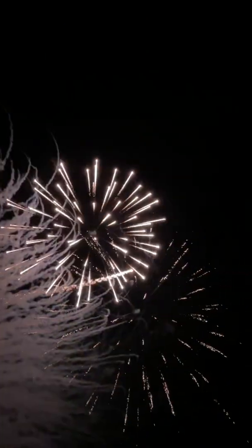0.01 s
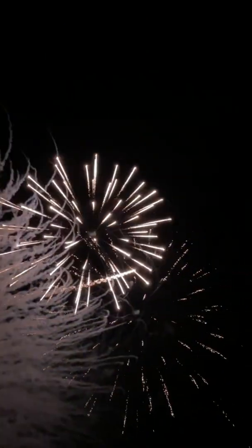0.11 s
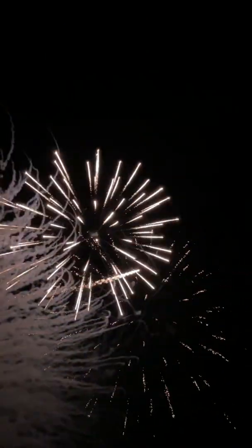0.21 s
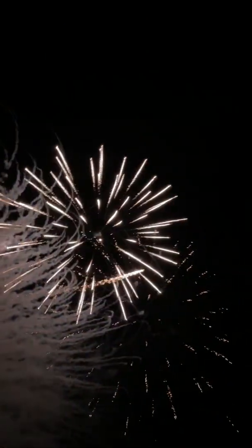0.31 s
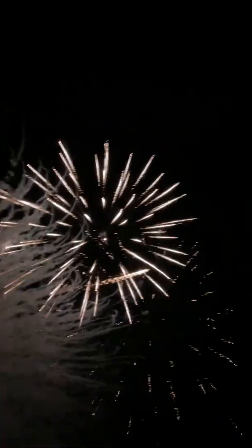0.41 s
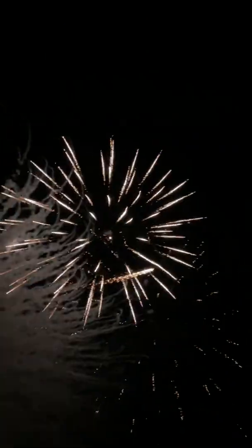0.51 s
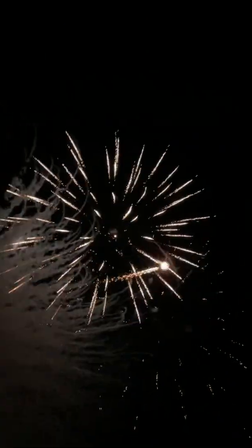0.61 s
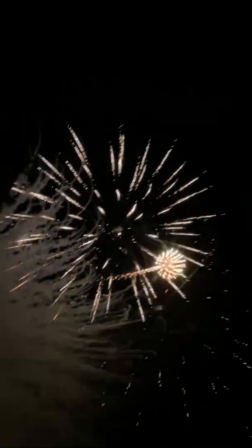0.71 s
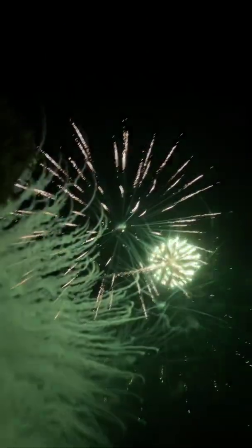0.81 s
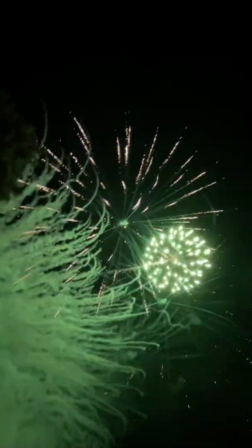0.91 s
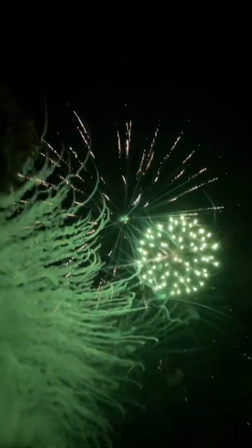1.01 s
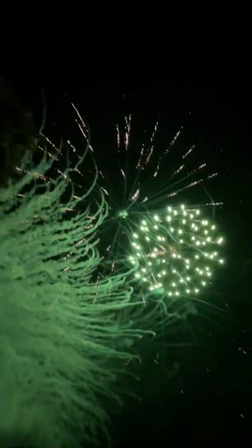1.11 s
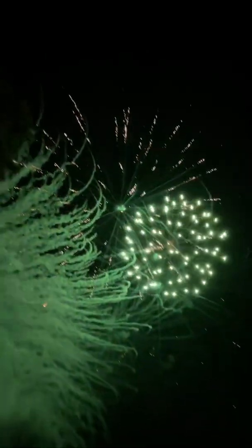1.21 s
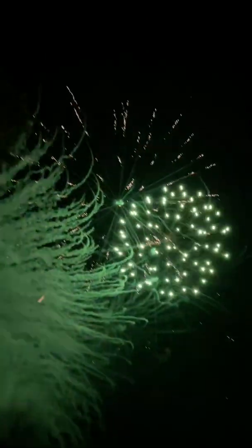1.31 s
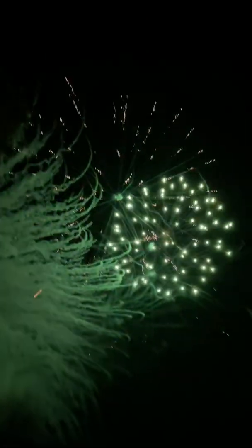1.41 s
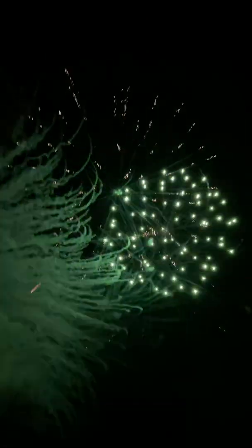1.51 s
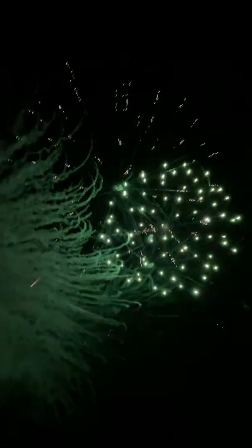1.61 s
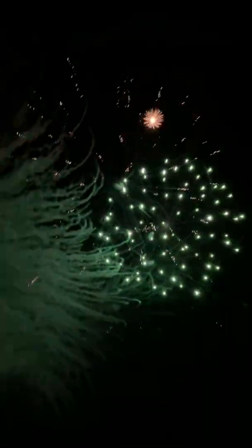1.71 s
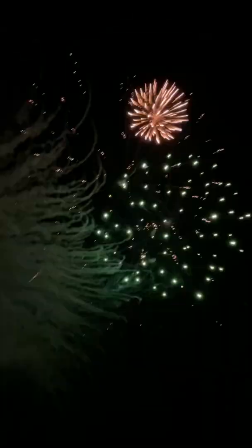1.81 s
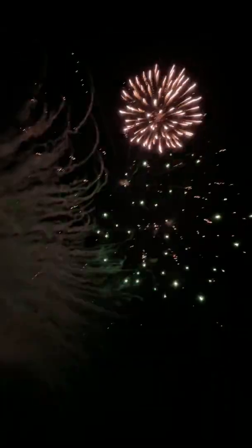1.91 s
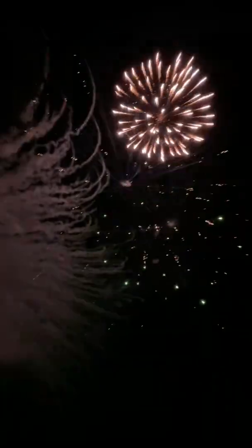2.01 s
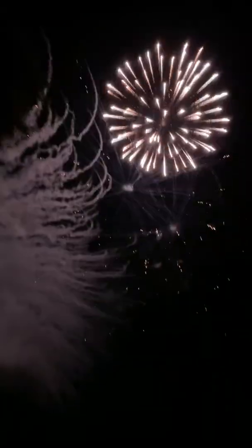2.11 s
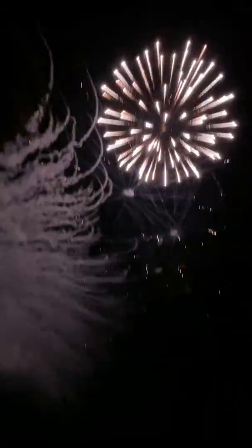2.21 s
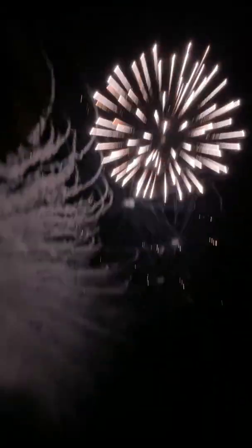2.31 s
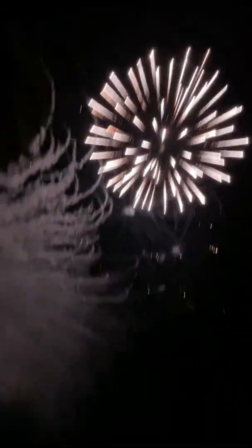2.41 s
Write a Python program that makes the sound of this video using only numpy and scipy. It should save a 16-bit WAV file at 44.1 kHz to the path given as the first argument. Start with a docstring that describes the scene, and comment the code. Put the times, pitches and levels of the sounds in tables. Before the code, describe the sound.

Firework shells burst outdoors: one ragged crack with a deep thump, then two round booming bangs

```python
"""Open ground at night, under bursting firework shells: one ragged crack with a deep thump, then two round bangs.
Each burst is a short pressure pulse with a ground echo, and rolls away as fading noise from all around.
An earlier roll is still dying away over a low rumble; small pops and dull thuds lie between the bursts.
The microphone delays the bass, so every bang sweeps downward, and its right port is loudest near 2 kHz."""
import sys
import numpy as np
from scipy import signal
from scipy.fft import rfft, irfft
from scipy.io import wavfile
from scipy.ndimage import map_coordinates

SR = 44100
rng = np.random.default_rng(int(sys.argv[2]) if len(sys.argv) > 2 else 0)


def transcribe(signal):
    """Save signal, clipped to [-1, 1], as a 16-bit WAV file at the path in sys.argv[1]."""
    frames = np.atleast_2d(signal).T
    limited = np.clip(frames, -1, 1)
    pcm = np.round(limited * 32767).astype(np.int16)
    wavfile.write(sys.argv[1], SR, pcm)


N = 110250  # samples in the scene
SIZE = 4 * SR  # samples in each spectrum, with spare room after the scene
HZ = np.fft.rfftfreq(SIZE, 1 / SR)
T = np.arange(N) / SR


def amp(db):
    """Turn decibels into a plain gain."""
    return 10 ** (np.asarray(db) / 20)


def along(points, hz=HZ):
    """Join (frequency, value) points with straight lines on a log frequency axis."""
    point_hz, value = np.transpose(points)
    return np.interp(np.log(hz + 1), np.log(point_hz + 1), value)


def causal(points):
    """Filter with the given (Hz, dB) gain that reacts as early as it can (minimum phase)."""
    cepstrum = irfft(np.log(amp(along(points))))
    # folding the second half onto the first keeps the gain and leaves nothing before time zero
    cepstrum[1:SIZE // 2] *= 2
    cepstrum[SIZE // 2 + 1:] = 0
    return np.exp(rfft(cepstrum))


def delay(seconds):
    """Spectrum of a plain delay: a phase turn that grows with frequency."""
    return np.exp(-2j * np.pi * HZ * seconds)


def sound(spectrum):
    """Turn a spectrum into the samples of the scene."""
    return irfft(spectrum, SIZE)[..., :N]


def wobble(rate):
    """A smooth random curve through `rate` random points a second."""
    return map_coordinates(rng.standard_normal(1024), [T * rate], mode="wrap")


# how alike left and right are, 1 = the same, -1 = opposite: (frequency [Hz], likeness [-1 to 1])
LIKENESS = [(60, 1), (120, 0.98), (240, 0.91), (380, 0.32), (520, 0.055), (750, -0.61), (1050, -0.63),
            (1400, 0.22), (1800, 0.53), (2800, -0.034), (4000, 0.17), (7500, -0.18), (15000, 0.32)]


def diffuse(points):
    """Stereo noise from all around: a shared part and an opposed part, most alike in the bass."""
    angle = np.arccos(np.clip(along(LIKENESS), -1, 1)) / 2
    noise = rfft(rng.standard_normal((2, SIZE))) * amp(along(points))
    mid, side = noise * [np.cos(angle), np.sin(angle)]
    return sound(np.array([mid + side, mid - side]))


def pulse(points, ragged_hz, ragged_s):
    """Spectrum of one pressure pulse: clean below ragged_hz, torn into a short noise burst above."""
    burst = rng.standard_normal((2, N)) * T * np.exp(-T / ragged_s)
    torn = rfft(burst / np.linalg.norm(burst, axis=1, keepdims=True), SIZE)
    torn /= np.sqrt(np.abs(torn) ** 2 + .1)  # even out the burst's own peaks and gaps
    torn_share = HZ ** 2 / (HZ ** 2 + ragged_hz ** 2)
    clean_share = np.sqrt(1 - torn_share ** 2)
    return causal(points) * (clean_share + torn_share * torn)


ECHO_SPREAD_S = .0008  # the ground echo reaches the right port this much after the left


def ground(lag_s, echo_db, dull_hz):
    """The direct path plus a later copy off the ground, duller above dull_hz."""
    paths = np.array([delay(lag_s - ECHO_SPREAD_S / 2), delay(lag_s + ECHO_SPREAD_S / 2)])
    return 1 + paths * amp(echo_db) / (1 + 1j * HZ / dull_hz)


# time the roll takes to drop by 60 dB: (frequency [Hz], time [s])
ROLL_DECAY = [(60, 1.67), (250, 1.88), (1000, 2.7), (2300, 1.87), (4200, 1.41), (8000, 1.075),
              (14000, 0.39)]
BLOOM_S, BLOOM_DB, BLOOM_WIDTH_S = 0.17, 1.5, .065  # the strongest group of echoes: age, lift, width
SCATTER_S = 0.004  # decay time of the scatter from close by


def roll(start, points, early_db, early_s, hold_s, scatter_db, flutter_db, bloom_s=BLOOM_S):
    """Noise for countless far echoes after brief close scatter: they bloom and die away, the high treble fastest."""
    hz, t, bands = signal.stft(diffuse(points), SR, nperseg=512)
    # each band holds its level for hold_s, then fades at its own speed
    bands = bands * amp(-60 * np.maximum(t - start - hold_s, 0) / along(ROLL_DECAY, hz)[:, None])
    fading = signal.istft(bands, SR, nperseg=512)[1][:, :N]
    age = np.maximum(T - start, 0)
    early = early_db * np.clip(1 - age / early_s, 0, 1)  # extra level that fades out over early_s
    bloom = BLOOM_DB * np.exp(-((age - bloom_s) / BLOOM_WIDTH_S) ** 2)
    far = amp(early + bloom)
    near = amp(scatter_db) * np.exp(-age / SCATTER_S)
    onset = np.clip(age / 0.0023, 0, 1)
    flutter = amp(flutter_db * (wobble(30.03) + wobble(220)))
    return fading * np.hypot(far, near) * onset * flutter


# spectrum of the earlier shell's roll: (frequency [Hz], level [dB])
EARLIER_SPECTRUM = [(20, -35), (60, -3.5), (130, -4.5), (260, -8), (420, -20.5), (800, -17.5),
                    (1400, -21.5), (2300, -22), (4000, -27), (6500, -34), (9500, -33), (11500, -54),
                    (16000, -61.5)]


def earlier_roll():
    """The roll of a shell that burst before the scene begins, still dying away."""
    return amp(-2.5) * roll(-0.28, EARLIER_SPECTRUM, early_db=0, early_s=.1, hold_s=0.11,
                            scatter_db=0, flutter_db=0.56)


# spectrum of the background rumble: (frequency [Hz], level [dB])
RUMBLE_SPECTRUM = [(20, -56), (40, -43.5), (62, -21.5), (220, -30.5), (450, -42.5), (1000, -45),
                   (2300, -49), (4000, -61), (8000, -74.5), (12000, -90)]


def rumble():
    """Steady noise from all around, strongest in the bass."""
    return diffuse(RUMBLE_SPECTRUM)


# dull far thuds and late echoes: (time [s], level [dB], pitch [ratio])
THUD_EVENTS = [(.007, -3, 1.24), (0.077, -1, 1.14), (.284, -1.5, 1.36), (.632, 3, 0.76),
               (1.315, -5.5, 1.48)]
# spectrum of a thud at pitch 1: (frequency [Hz], level [dB])
THUD_SPECTRUM = [(25, -9), (58, 21), (92, 28.5), (160, 14), (280, 1), (1000, -43), (8000, -100)]


def thuds():
    """Far reports and strong late echoes of which only the bass arrives."""
    total = 0
    for start, db, pitch in THUD_EVENTS:
        shifted = np.array(THUD_SPECTRUM) * [pitch, 1]  # move the frequencies, keep the levels
        total = total + amp(db) * delay(start) * causal(shifted)
    return sound(total)


# small sharp pops: (time [s], level [dB], treble tilt above 2400 Hz [dB per octave], burst decay [s])
POP_EVENTS = [(0.193, 1.5, 2.5, 0.00075), (0.845, -5.5, -19, 0.0038), (1.4007, -3.5, -7, 0.00026),
              (2.0987, -12, 5, .0005)]
# spectrum of a pop before its tilt: (frequency [Hz], level [dB])
POP_SPECTRUM = [(100, -6.5), (700, -9), (2300, -2.5), (5000, -9.5), (9500, -13), (13000, -27.5),
                (16000, -31)]
POP_SCATTER_DB, POP_SCATTER_S = -33, .009  # level and decay time of the scatter behind each pop


def pops():
    """Small charges snap high up, the far ones duller, each with a short scatter behind it."""
    total = 0
    octaves_up = np.log2(np.maximum(HZ / 2400, 1))
    for start, db, tilt_db, decay_s in POP_EVENTS:
        noise = amp(POP_SCATTER_DB) * diffuse(POP_SPECTRUM)
        scatter = rfft(noise * np.exp(-T / POP_SCATTER_S), SIZE)
        snap = pulse(POP_SPECTRUM, ragged_hz=1430, ragged_s=decay_s) + scatter
        total = total + amp(db + tilt_db * octaves_up) * delay(start) * snap
    return sound(total)


# ragged shell: (time [s], blast level [dB], roll level [dB], ground echo delay [s])
CRACK_EVENTS = [(.214, 0.491, -2, .0124)]
# spectrum of the ragged blast: (frequency [Hz], level [dB])
CRACK_SPECTRUM = [(20, 19), (42, 36.5), (65, 46), (120, 46), (185, 32.5), (260, 1.5), (420, 5), (700, 11.5),
                  (2200, 13.5), (3200, 19), (4300, 14.5), (6000, 3.5), (8600, 14), (12000, -7.5),
                  (16000, 7.5)]
# spectrum of its rolling echoes: (frequency [Hz], level [dB])
CRACK_ROLL_SPECTRUM = [(20, -30.5), (42, -12), (65, -5), (130, -4.5), (230, -20), (400, -28.5), (800, -18),
                       (1400, -25), (2300, -22), (4000, -26.5), (6500, -33), (9000, -33.5), (10100, -37),
                       (11000, -64.5), (16000, -43)]


def cracks():
    """A shell with a torn, bright front and a deep thump, echoed by the ground, then rolling away."""
    out = np.zeros((2, N))
    for start, blast_db, roll_db, lag_s in CRACK_EVENTS:
        blast = pulse(CRACK_SPECTRUM, ragged_hz=900, ragged_s=.0011)
        blast = blast * ground(lag_s, echo_db=-12.5, dull_hz=2575)
        out += amp(blast_db) * sound(blast * delay(start))
        out += amp(roll_db) * roll(start, CRACK_ROLL_SPECTRUM, early_db=2.5, early_s=0.36, hold_s=0.036,
                                   scatter_db=17.5, flutter_db=1.5, bloom_s=.13)
    return out


# round shells: (time [s], blast level [dB], roll level [dB], ground echo delay [s],
#                wall echo delay [s], wall echo level [dB])
BANG_EVENTS = [(0.9568, -5.5, -4.5, .0094, .028, -10), (2.0549, -3.5, -2.5, .0095, 0.0197, -4)]
# spectrum of the round blast: (frequency [Hz], level [dB])
BANG_SPECTRUM = [(20, 21), (50, 39), (100, 43), (230, 39.5), (320, 39), (420, 31), (600, 29.5), (1000, 17),
                 (2200, 17), (3300, 5), (4300, 6), (8000, -0.5), (12000, -20.5), (16000, -4)]
# spectrum of its rolling echoes: (frequency [Hz], level [dB])
BANG_ROLL_SPECTRUM = [(20, -37), (42, -32), (65, -14), (130, -7.5), (250, -11.5), (420, -21.5),
                      (800, -20.5), (1400, -26), (2300, -25.5), (4000, -31), (6500, -38), (9000, -39),
                      (10100, -44.5), (11000, -77.5), (16000, -49.5)]
WALL_DULL_HZ = 157  # only the bass comes back from a wall nearby


def bangs():
    """Shells with a clean, round blast, echoed by the ground and a wall, then rolling away."""
    out = np.zeros((2, N))
    for start, blast_db, roll_db, lag_s, wall_s, wall_db in BANG_EVENTS:
        wall = amp(wall_db) * delay(wall_s) / (1 + (HZ / WALL_DULL_HZ) ** 4)
        paths = ground(lag_s, echo_db=-3.5, dull_hz=2110) + wall
        blast = pulse(BANG_SPECTRUM, ragged_hz=2310, ragged_s=0.00051) * paths
        out += amp(blast_db) * sound(blast * delay(start))
        out += amp(roll_db) * roll(start, BANG_ROLL_SPECTRUM, early_db=8.5, early_s=0.041, hold_s=.15,
                                   scatter_db=4, flutter_db=0.74)
    return out


def scene():
    """All bursts over the end of an earlier roll and a low background."""
    return earlier_roll() + rumble() + thuds() + pops() + cracks() + bangs()


# gain of the microphone's right port: (frequency [Hz], gain [dB])
RIGHT_GAIN = [(300, -1), (750, 0.5), (1200, 2), (1620, 4.5), (1800, 12), (1960, 9), (2300, 13.5),
              (2620, 11), (2850, 4), (3300, 0.5), (4300, -1.5), (6500, -2.5), (10000, -0.5)]
BASS_DELAY_S, DELAY_KNEE_HZ = 0.0459, 42.5  # delay of the very lowest bass; it has halved at the knee
TREBLE_LEAD_S, LEAD_FROM_HZ = 0.000738, 1200  # the right side's treble arrives early
PEAK, TOP_HZ = .95, 16100  # clipping level (full scale = 1) and upper band limit


def record(dry):
    """The microphone delays the bass, colours the right side and advances its treble, clips and cuts the top."""
    sweep = np.exp(-2j * np.pi * BASS_DELAY_S * DELAY_KNEE_HZ * np.log1p(HZ / DELAY_KNEE_HZ))
    lead = np.exp(2j * np.pi * TREBLE_LEAD_S * np.maximum(HZ - LEAD_FROM_HZ, 0))
    ports = np.array([np.ones(len(HZ)), amp(along(RIGHT_GAIN)) * lead])
    heard = sound(rfft(dry, SIZE) * ports * sweep)
    clipped = np.clip(heard, -PEAK, PEAK)
    return signal.sosfilt(signal.butter(24, TOP_HZ, fs=SR, output="sos"), clipped)


dry = scene()
out = record(dry)
transcribe(out)
```